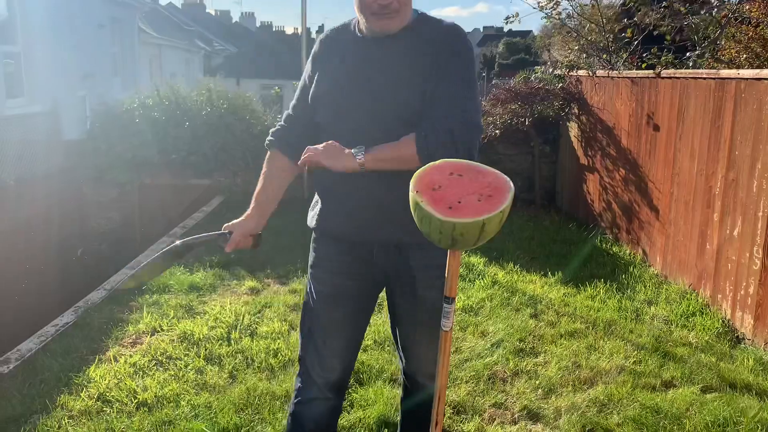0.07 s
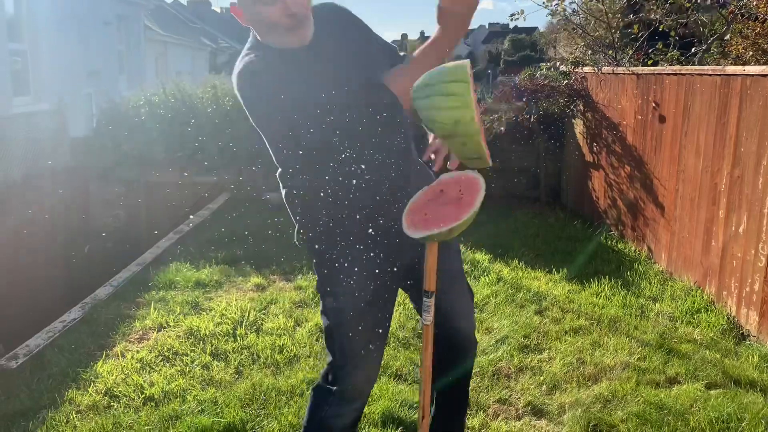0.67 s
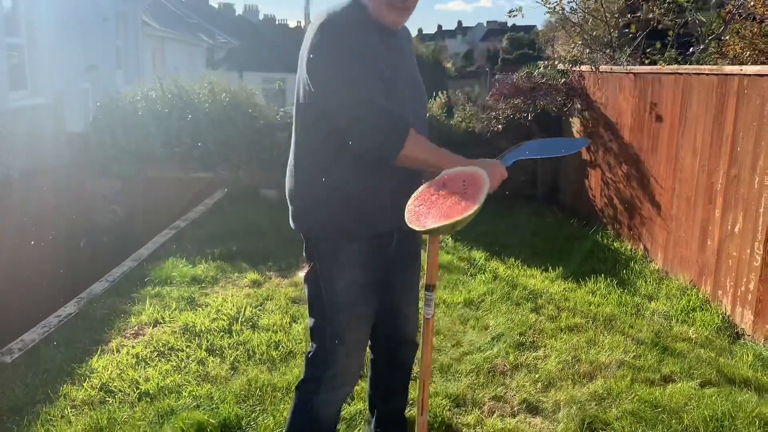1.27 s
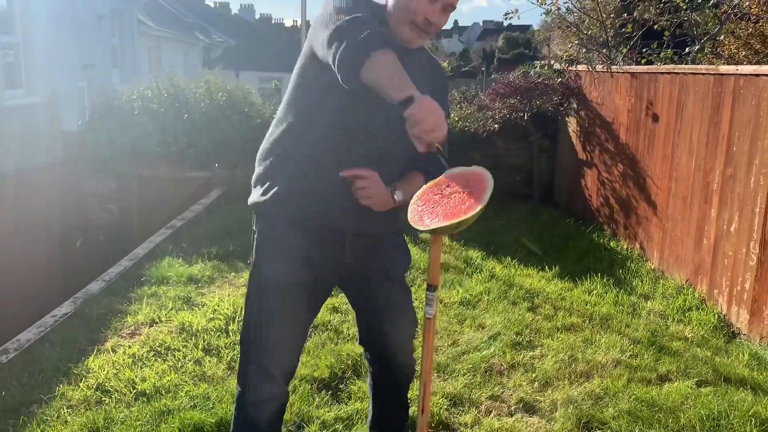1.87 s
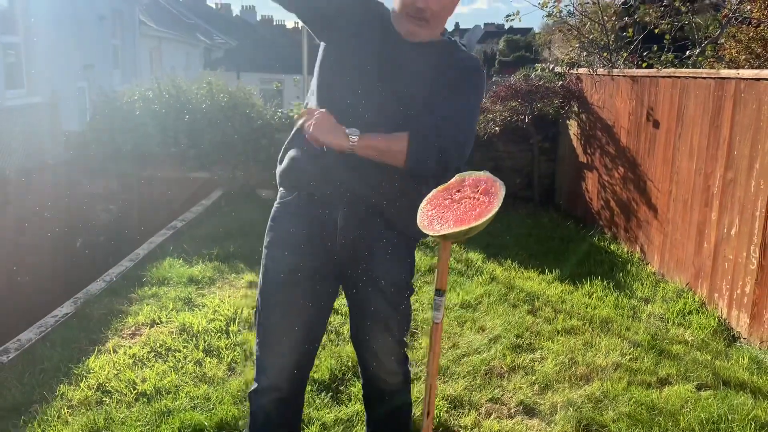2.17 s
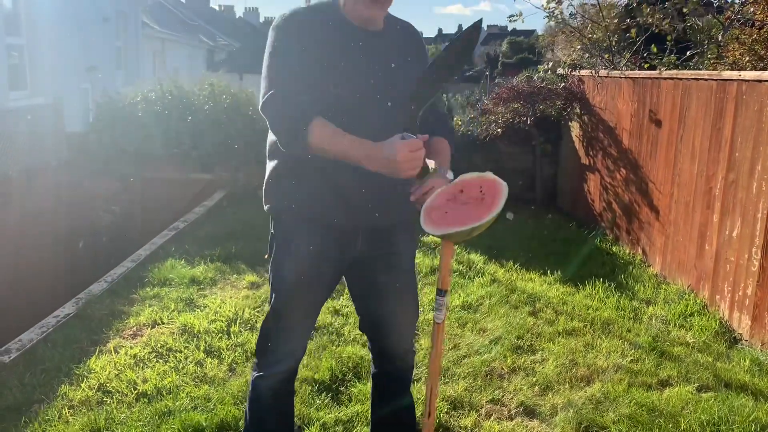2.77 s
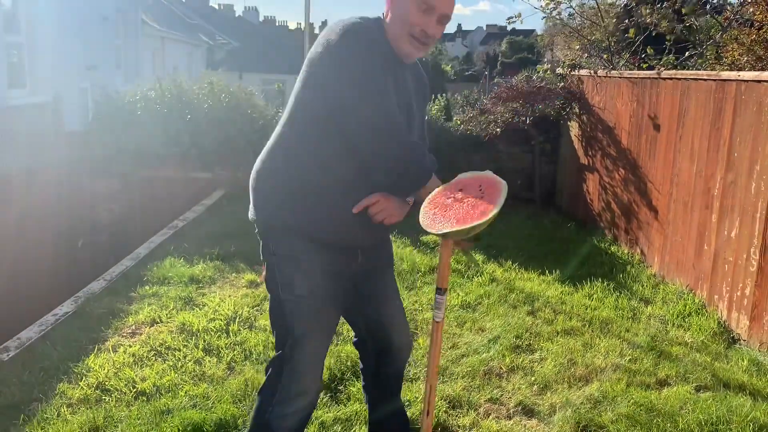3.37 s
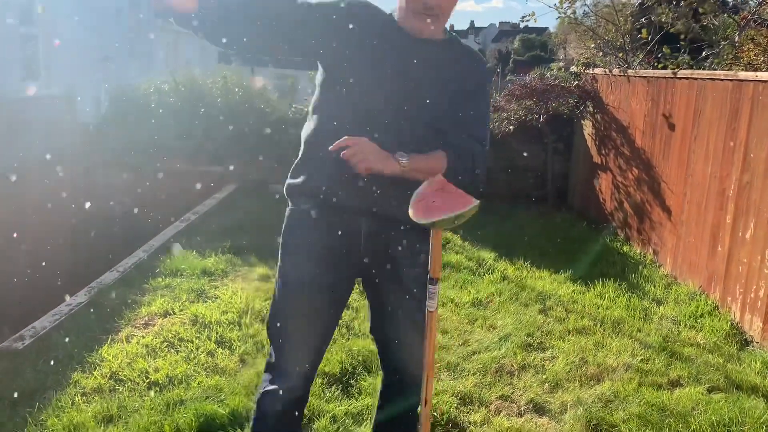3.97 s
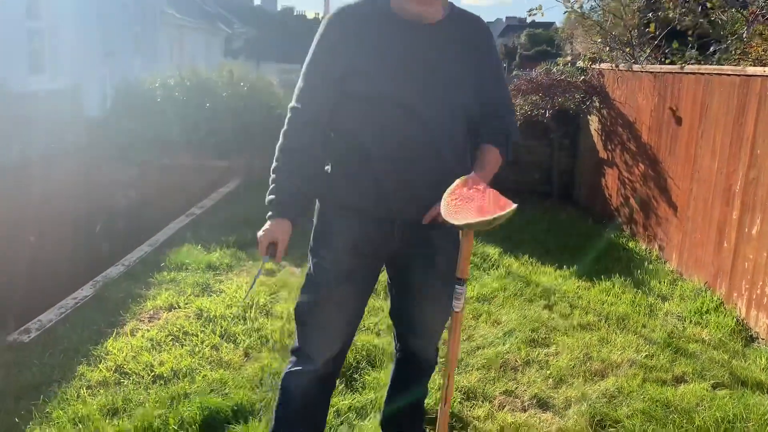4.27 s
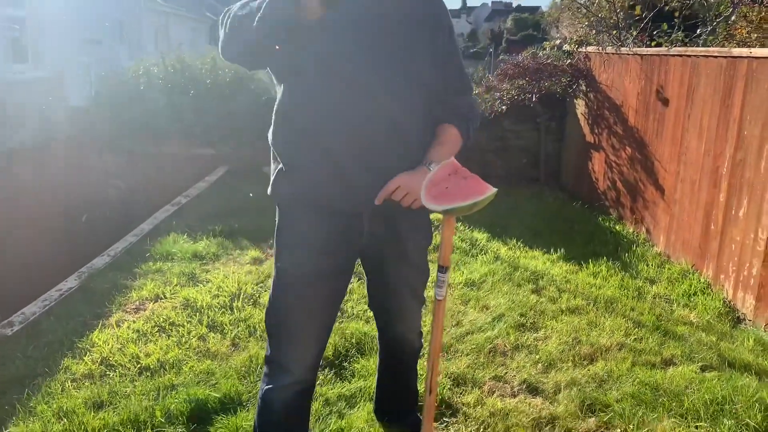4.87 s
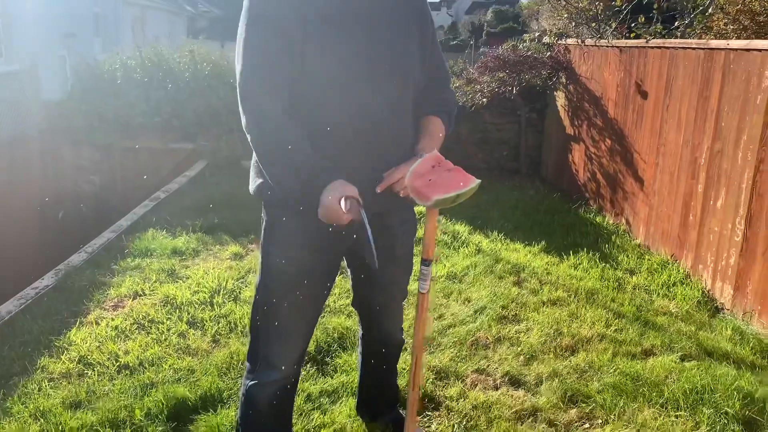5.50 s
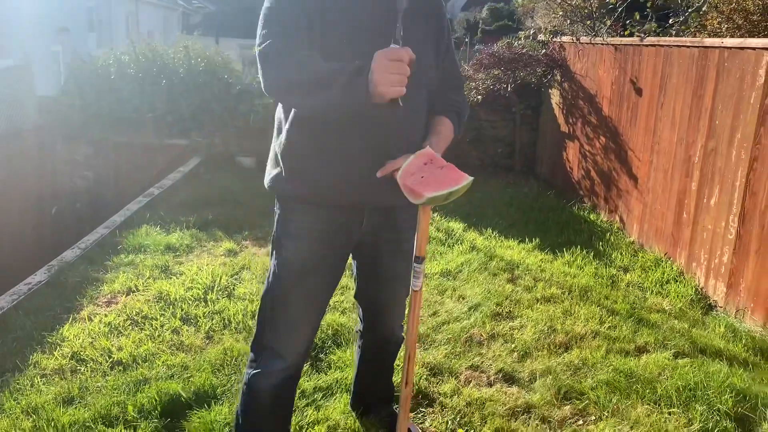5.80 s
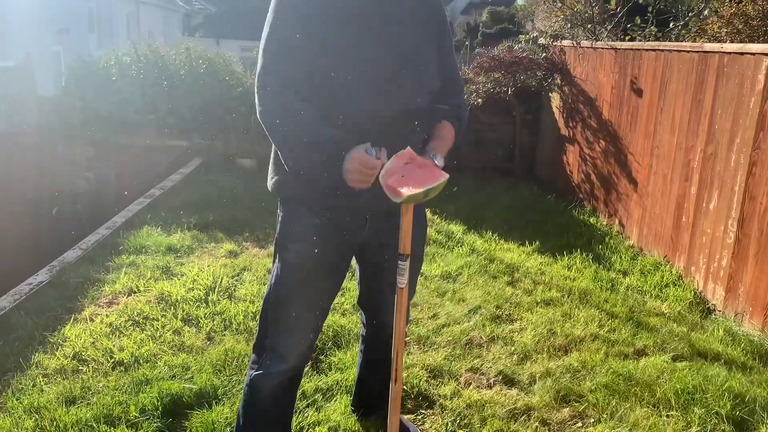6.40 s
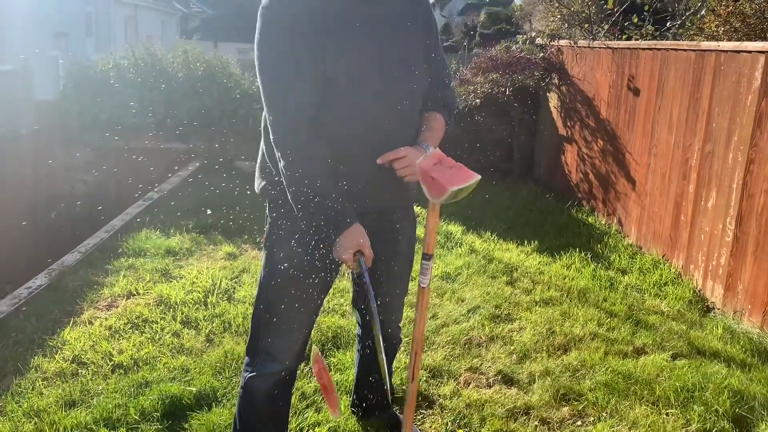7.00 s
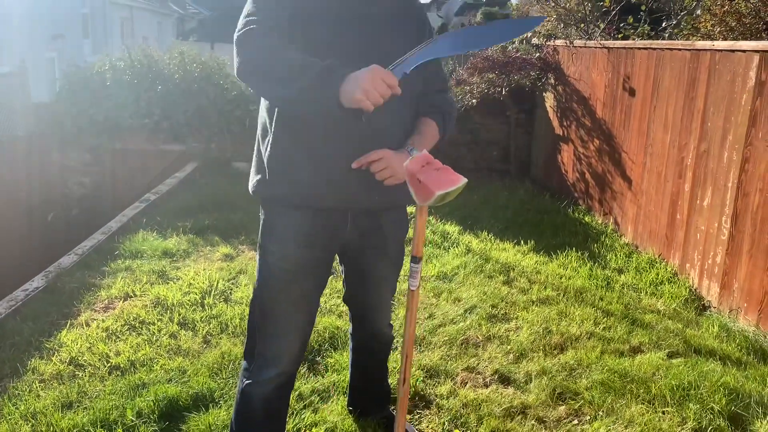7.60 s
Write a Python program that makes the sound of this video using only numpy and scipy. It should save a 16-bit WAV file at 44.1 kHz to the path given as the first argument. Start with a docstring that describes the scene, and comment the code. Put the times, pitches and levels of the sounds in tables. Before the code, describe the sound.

A long blade chops a watermelon with sharp, wet cracks, and pieces thump onto grass while wind buffets the microphone.

```python
"""A long steel blade slices a watermelon on a pole in a small fenced garden, six strokes in all.
Distant traffic, leaves and wind on the microphone run from the start. After an opening knock and splat,
the first stroke lands at 0.6 s: rind cracks, wet flesh tears, juice sprays. Pieces thump on the lawn
at 1.3 s. Strokes follow at 1.9, 3.5 and 5.1 s, with more falling pieces; the gusts peak near 5.4 s.
The last two come at 6.0 and 6.9 s. The blade rings faintly after strokes two, four and six."""
import sys
import numpy as np
from scipy import signal
from scipy.fft import rfft, irfft, next_fast_len
from scipy.io import wavfile
from scipy.ndimage import uniform_filter1d

SR = 44100
rng = np.random.default_rng(int(sys.argv[2]) if len(sys.argv) > 2 else 0)


def wav_record(signal):
    """Record a signal, one row per channel, as 16-bit PCM in the file named by sys.argv[1]."""
    frames = np.transpose(np.atleast_2d(signal))
    bounded = np.clip(frames, -1, 1)
    # unit amplitude maps onto the largest positive 16-bit level
    quanta = np.round(bounded * 32767).astype(np.int16)
    wavfile.write(sys.argv[1], SR, quanta)


N = 337365
CUTOFF_HZ = 15800


# blade through melon: rise/s, t/s, length/s, thud/dB, pulp/dB, pulp f/Hz, spray/dB
BLADE_CUTS = [(.002, 0.5985, 0.019, -27.5, -25.5, 2360, -27.5),
              (.001, 1.9112, 0.0032, -34, -28, 1800, -29.5),
              (.002, 3.5088, 0.0049, -33, -22.5, 1900, -27.5),
              (.002, 5.1380, 0.0034, -49, -28.5, 1500, -24), (0.0079, 6.0035, 0.013, -44.5, -32, 1620, -32),
              (0.0055, 6.8615, 0.016, -42, -28, 1570, -29.5)]
def strokes(slit_s=.01, slit_re_pulp_db=-16):
    """The edge hisses through the skin, then bites: at once if square, gradually if shaving a slice."""
    out, t = np.zeros((2, N)), seconds(size=2048)
    for rise_s, at_s, length_s, thud_db, pulp_db, pulp_hz, spray_db in BLADE_CUTS:
        slit = band(rng.standard_normal(len(t)) * (t / slit_s) * (t < slit_s), pulp_hz, pulp_hz * 2)
        add(out, at_s - slit_s, from_db(pulp_db + slit_re_pulp_db) * slit)
        bite = wet_blow(rise_s, length_s, thud_db, pulp_db, pulp_hz, spray_db,
                        body_hz=340, thud_decay_s=.0097)
        add(out, at_s, bite)
    return out


# hollow resonances of the fruit: f/Hz, width/Hz, gain/dB
MELON_MODES = [(1206, 280, -26.5), (1602, 110, -28), (2320, 130, -30)]
def wet_blow(rise_s, length_s, thud_db, pulp_db, pulp_hz, spray_db, body_hz, thud_decay_s):
    """The body thuds, pulp crushes in uneven spurts and juice sprays while contact lasts."""
    t = seconds(size=8192)
    tearing = rms_one(uniform_filter1d(rng.standard_normal(len(t)), size=70))
    spurts = rms_one(from_db(3 * tearing))
    push = widen(rng.standard_normal((2, len(t))), alike=.95) * swell(t, rise_s, length_s, thud_decay_s)
    crush = widen(grains(len(t), spread_db=8.5), alike=.68)
    crush *= spurts * swell(t, rise_s, length_s, decay_s=.0066)
    spray = grains(len(t), spread_db=5.5) * spurts * swell(t, rise_s, length_s, decay_s=.0053)
    thud = band(push, body_hz / 1.67, body_hz * 1.39)
    pulp = band(crush, pulp_hz / 2.42, pulp_hz * 1.437)
    hollow = sum(from_db(db) * band(pulp, hz - width / 2, hz + width / 2) for hz, width, db in MELON_MODES)
    flesh = from_db(-1) * pulp + hollow
    squelch = from_db(-7.5) * band(widen(spray, alike=.6), low_hz=2900, high_hz=4700)
    mist = band(spray[0], low_hz=5900, high_hz=14300)
    return from_db(thud_db) * thud + from_db(pulp_db) * flesh + from_db(spray_db) * (squelch + mist)


# rind snaps and knocks: t/s, peak/dB, f/Hz, rise/cycles
RIND_CRACKS = [(0.0642, -19, 520, 0.45), (0.5985, -9, 1570, 0.55), (1.2832, -15, 2500, 1.2),
               (1.3703, -23.5, 1450, 1.6), (1.9113, -19, 1860, 0.92), (3.5083, -9.5, 1210, 0.71),
               (4.0358, -18, 1520, 0.76), (4.0824, -16, 3500, 2.0), (6.0120, -22.5, 1120, 1.4),
               (6.8667, -18, 1770, 0.86)]
def cracks(tick_re_snap_db=-14, tick_decay_s=.0008, gap_s=.0035, loss_db=6, scatter=.25):
    """Skin parts with a tick, stiff rind with a damped snap; the split runs on in weaker snaps."""
    out, t = np.zeros((2, N)), seconds(size=2048)
    for at_s, peak_db, hz, rise_cycles in RIND_CRACKS:
        tick = widen(rng.standard_normal((2, len(t))), alike=.5) * np.exp(-t / tick_decay_s)
        add(out, at_s, from_db(peak_db + tick_re_snap_db) * band(tick, low_hz=2600, high_hz=7000))
        snap_hz = hz
        for k, (gap_ratio, pitch_ratio) in enumerate(np.exp(scatter * rng.standard_normal((5, 2)))):
            age = t * snap_hz / rise_cycles
            snap = age * np.exp(1 - age) * np.sin(2 * np.pi * snap_hz * t)
            add(out, at_s, from_db(peak_db - k * loss_db) * snap)
            at_s += gap_s * gap_ratio
            snap_hz = hz * pitch_ratio
    return out


# pieces on the lawn, plus a second bite of the last stroke at 6.9 s: t/s, length/s, thud/dB, pulp/dB, pulp
# f/Hz, spray/dB
FALLING_PIECES = [(0.061, .018, -33.5, -37, 2860, -33), (1.2623, 0.03, -30.5, -26.5, 2190, -31),
                  (1.2823, 0.0022, -23, -24, 3500, -30), (1.298, 0.04, -32, -39, 2900, -43.5),
                  (1.3465, 0.0022, -33, -28, 3300, -44), (1.370, 0.0045, -31.5, -34, 2220, -41.5),
                  (1.385, 0.064, -38, -50.5, 1580, -61), (4.0089, 0.016, -28.5, -24, 2940, -32.5),
                  (4.031, 0.022, -30, -29.5, 1640, -47), (4.081, 0.002, -26, -19, 3500, -33.5),
                  (4.100, 0.005, -31, -29.5, 2300, -38.5), (4.284, 0.021, -40, -39.5, 1890, -52.5),
                  (4.323, 0.033, -37.5, -47.5, 1970, -59), (5.3105, 0.0012, -36, -36.5, 2690, -45.5),
                  (5.3433, 0.0033, -32, -32, 1700, -60), (6.2532, 0.015, -33, -40, 2200, -41.5),
                  (6.277, 0.02, -31, -48.5, 1700, -50), (6.895, 0.018, -34.5, -39.5, 1750, -50),
                  (7.191, 0.0018, -53, -59, 2500, -39)]
def landings():
    """Soft ground gives a deeper, longer thud; longer contacts build more slowly."""
    out = np.zeros((2, N))
    for at_s, length_s, *blow in FALLING_PIECES:
        add(out, at_s, wet_blow(.09 * length_s, length_s, *blow, body_hz=284, thud_decay_s=.02))
    return out


# juice and crumbs: t/s, level/dB, treble re middle/dB
JUICE_DROPS = [(2.136, -54, 7), (4.285, -37, -5.5), (4.383, -43, -9.5), (4.511, -41, -13),
               (4.569, -36.5, 0), (4.6496, -51, 5.5), (6.5087, -42.5, -1)]
def drops(decay_s=.0061):
    """Juice and crumbs of flesh hit the grass as small wet ticks."""
    out, t = np.zeros((2, N)), seconds(size=4096)
    for at_s, level_db, treble_db in JUICE_DROPS:
        splash = grains(len(t), spread_db=-1.5) * np.exp(-t / decay_s)
        middle = band(splash, low_hz=1200, high_hz=4430)
        treble = from_db(treble_db) * band(splash, low_hz=4600, high_hz=CUTOFF_HZ)
        add(out, at_s, from_db(level_db) * (middle + treble))
    return out


# blade rings: t/s, level/dB, t60/s, time until damped/s, pitch ratio (flat when pulp clings)
BLADE_RINGS = [(1.914, -36, .25, .19, .981), (5.138, -52, .9, .145, 1), (6.885, -47.5, .45, .24, 1)]
# steel modes: f/Hz, level/dB, share of t60
BLADE_MODES = [(5568, 0, .45), (5610, 0, 1.0), (5790, -4, .3), (14230, -7, .4)]
def blade_ring(wavers_per_s=45, doppler=.0018, turn_db=1.2):
    """Free of the fruit, the steel rings until damped, wavering as it swings and turns."""
    out, t = np.zeros((2, N)), seconds(size=32768)
    quadrature = np.array([[0], [np.pi / 2]])
    for at_s, level_db, t60_s, free_s, pitch_ratio in BLADE_RINGS:
        swing, turn = drift(wavers_per_s)[:len(t)], drift(wavers_per_s)[:len(t)]
        warped_s = np.cumsum(1 + doppler * swing) / SR
        gate = swell(t, rise_s=.025, length_s=free_s, decay_s=.0153)
        for hz, mode_db, share in BLADE_MODES:
            phase = rng.uniform(0, 2 * np.pi) + quadrature
            fade = from_db(level_db + mode_db + turn_db * turn - 60 * t / (t60_s * share))
            add(out, at_s, fade * gate * np.sin(2 * np.pi * hz * pitch_ratio * warped_s + phase))
    return out


# phase between microphone ports: f/Hz, left lead/rad
PORT_LEAD = [(2000, 0), (3500, 2.1), (5500, 2.1), (8500, -3.5), (15500, -16)]
def ports(x):
    """The two ports hear the treble of near sounds out of step, half the shift on each side."""
    size = next_fast_len(N)
    lead_rad = np.interp(np.arange(size // 2 + 1) * SR / size, *np.transpose(PORT_LEAD))
    shift = np.exp(1j * lead_rad / 2 * np.array([[1], [-1]]))
    return irfft(rfft(x, size) * shift, size)[:, :N]


# echo tail: f/Hz, t60/s
TAIL_DECAY = [(1000, 0.13), (3500, 0.3), (15000, 0.12)]
def garden_echo(x, near_db=-12.5, near_decay_s=.015, far_db=-16, far_rise_s=.01, lowpass_hz=9600):
    """Ground and fence scatter the sound at once; houses and hedges return a short thin tail."""
    t, edges_hz = seconds(size=20000), np.geomspace(120, 18000, 8)
    tail = 0
    for low, high in zip(edges_hz, edges_hz[1:]):
        fade = from_db(-60 * t / at_hz(TAIL_DECAY, np.sqrt(low * high)))
        tail += band(rng.standard_normal((2, len(t))), low, high) * np.sqrt(high - low) * fade
    pole = np.exp(-2 * np.pi * lowpass_hz / SR)
    tail = signal.lfilter([1 - pole], [1, -pole], tail * np.minimum(t / far_rise_s, 1))
    near = grains(len(t), spread_db=14) * (t > .002) * np.exp(-t / near_decay_s)
    response = (from_db(near_db) * rms_one(near) + from_db(far_db) * rms_one(tail)) / np.sqrt(len(t))
    return signal.fftconvolve(x, response, axes=1)[:, :N]


# breeze on the microphone: t/s, level/dB
BREEZE_LEVELS = [(0, -40.5), (.42, -51.5), (1.18, -55), (1.32, -36.5), (2.06, -45), (2.41, -31),
                 (2.65, -47.5), (2.95, -38), (3.5, -40), (3.98, -47.5), (5.21, -35.5), (5.28, -27),
                 (5.5, -25), (5.64, -38.5), (6.17, -39), (6.29, -27.5), (7.11, -44), (7.65, -36.5)]
# single gusts: peak t/s, half length/s, level/dB
GUST_SWELLS = [(0.228, 0.035, -30.5), (0.529, 0.11, -37.5), (1.013, 0.015, -39.5), (1.72, 0.029, -29.5),
               (1.96, 0.014, -29), (2.503, 0.05, -27.5), (2.743, 0.037, -33), (2.89, .025, -31),
               (3.0, 0.051, -28.5), (3.158, .015, -34), (3.33, 0.025, -30.5), (3.756, 0.11, -22),
               (4.046, 0.017, -25.0), (4.341, 0.046, -29.5), (4.606, 0.027, -25.5), (4.938, 0.067, -21),
               (5.132, 0.012, -20), (5.425, 0.042, -17), (5.84, 0.079, -26), (6.222, 0.012, -19.5),
               (6.533, 0.062, -21.5), (6.722, 0.096, -25.5), (6.903, 0.025, -25.5), (7.356, 0.071, -24.5),
               (7.569, 0.018, -26.5)]
def wind_strength_db(waver_db=4, wavers_per_s=22):
    """Bell-shaped gusts add their power to a wavering breeze."""
    breeze_db, = in_time(BREEZE_LEVELS)
    breeze = from_db(breeze_db + waver_db * drift(wavers_per_s))
    gusts = [from_db(db) * bell(at_s, half_s) for at_s, half_s, db in GUST_SWELLS]
    return 10 * np.log10(breeze ** 2 + sum(gust ** 2 for gust in gusts))


# wind spectra: f/Hz, relative density/dB
RUMBLE_SPECTRUM = [(15, -36.5), (30, -5.5), (55, 8), (90, 7), (135, 0), (200, -11), (600, -65)]
FLUTTER_SPECTRUM = [(70, -12), (130, 1.5), (190, 2.5), (330, -12.5), (600, -22.5), (2000, -91.5)]
def wind(flutter_db=-23.5, flutter_growth=1.345, lumps_db=4.5):
    """Gusts press on both ports alike; strong, sustained ones shed small swirls that differ at each."""
    strength_db = wind_strength_db()
    rumble = noise(RUMBLE_SPECTRUM, channels=1)
    rumble /= np.sqrt(uniform_filter1d(rumble ** 2, size=1800) + .0067)   # each gust keeps its strength
    sustained_db = uniform_filter1d(strength_db, size=3500) - strength_db.max()
    flutter = widen(noise(FLUTTER_SPECTRUM, channels=2), alike=1 - 2 * from_db(sustained_db) ** 2)
    flutter *= from_db(lumps_db * drift(per_s=60))
    return from_db(strength_db) * rumble + from_db(flutter_db + flutter_growth * sustained_db) * flutter


# eddies at the microphone: t/s, peak/dB, initial top f/Hz
EDDY_PUFFS = [(0.223, -21, 333), (0.513, -27, 350), (2.476, -20, 420), (3.739, -14, 760), (4.809, -24, 520),
              (4.894, -12, 720), (4.927, -19, 640), (5.225, -25, 700), (5.366, -18, 680),
              (5.394, -18.5, 700), (5.418, -13, 780), (5.484, -22.5, 563), (6.345, -21, 380),
              (6.455, -19, 390), (6.563, -17.5, 440), (6.700, -22.5, 440)]
def eddies(rise_s=.0036, band_ratio=4.2, slowing_s=.03):
    """An eddy breaks on the ports as a muffled puff that sinks in pitch as it slows."""
    out, t = np.zeros((2, N)), seconds(size=4096)
    slowed_s = slowing_s * np.log1p(t / slowing_s)
    for at_s, peak_db, top_hz in EDDY_PUFFS:
        push = rng.standard_normal((2, len(t))) * t / rise_s * np.exp(-t / rise_s)
        low_hz = top_hz / band_ratio
        swirl = band(band(push, low_hz, top_hz), low_hz, top_hz)
        puff = widen([rms_one(np.interp(slowed_s, t, row)) for row in swirl], alike=.37)
        add(out, at_s, from_db(peak_db) * puff / np.abs(puff).max())
    return out


# garden background: t/s, traffic/dB, branches/dB
GARDEN_LEVELS = [(0.0, -59, -66.5), (0.9, -54.5, -67), (2.77, -57.5, -62), (4.15, -54, -63),
                 (6.85, -55, -64.5), (7.65, -52, -60.5)]
# background spectra: f/Hz, relative density/dB
TRAFFIC_SPECTRUM = [(30, -5), (100, -0.5), (250, 10.5), (550, 3), (900, 5.5), (1400, -4), (5000, -44.5)]
BRANCH_SPECTRUM = [(700, -0.5), (1500, 6), (3800, -2), (9000, -29.5)]
def traffic_and_branches():
    """Far traffic hums; the breeze rushes through nearby branches."""
    traffic_db, branches_db = in_time(GARDEN_LEVELS)
    traffic = from_db(traffic_db) * widen(noise(TRAFFIC_SPECTRUM, channels=2), alike=.24)
    branches = from_db(branches_db) * noise(BRANCH_SPECTRUM, channels=2)
    return traffic + branches


# clothes, grass and falling juice: centre t/s, half length/s, hiss/dB, rub/dB
SOFT_SWISHES = [(.3, .2, -67, -76), (1.528, 0.1, -64, -61.5), (1.975, 0.055, -56, -65),
                (2.388, 0.087, -60, -72), (2.8, 0.096, -81.5, -62), (3.193, 0.097, -65, -65),
                (4.37, 0.31, -70, -66.5), (7.183, 0.012, -48.5, -66)]
# leaf and swish hiss: f/Hz, relative density/dB
HISS_SPECTRUM = [(2500, 6.5), (7000, 5.5), (13500, 5.5), (16000, -12.5)]
def rustle(leaves_db=-77, flicker_db=2.8):
    """Leaves hiss faintly; movement adds swells of hiss and rubbing cloth."""
    hiss_gain, rub_gain = from_db(leaves_db), 0
    for at_s, half_s, hiss_db, rub_db in SOFT_SWISHES:
        shape = bell(at_s, half_s)
        hiss_gain += from_db(hiss_db) * shape
        rub_gain += from_db(rub_db) * shape
    cloth = band(grains(N, spread_db=6.5), low_hz=1500, high_hz=3595)
    hiss = from_db(flicker_db * drift(per_s=130)) * noise(HISS_SPECTRUM, channels=2)
    return rub_gain * cloth + hiss_gain * hiss


def narrow_bass(x, mono_below_hz=190):
    """Long waves reach both ports alike."""
    mid, side = (x[0] + x[1]) / 2, (x[0] - x[1]) / 2
    side = signal.sosfilt(signal.butter(4, mono_below_hz, "high", fs=SR, output="sos"), side)
    return np.array([mid + side, mid - side])


def from_db(db):
    return 10 ** (np.asarray(db) / 20)


def rms_one(x):
    return x / np.sqrt(np.mean(x ** 2) + 1e-20)


def seconds(size):
    return np.arange(size) / SR


def in_time(rows):
    """One linear curve per level column."""
    times_s, *columns = np.transpose(rows)
    return [np.interp(seconds(N), times_s, column) for column in columns]


def at_hz(points, hz):
    """Table lookup on a log-frequency axis."""
    points_hz, values = np.transpose(points)
    return np.interp(np.log(np.maximum(hz, 1)), np.log(points_hz), values)


def band(x, low_hz, high_hz):
    """Causal band-pass; keeps white noise at its level."""
    high_hz = min(high_hz, .45 * SR)
    low_hz = min(low_hz, .9 * high_hz)
    sos = signal.butter(2, [low_hz, high_hz], "band", fs=SR, output="sos")
    return signal.sosfilt(sos, x + 1e-18) * np.sqrt(SR / 2 / (high_hz - low_hz))


def noise(spectrum, channels):
    """Independent rows of coloured noise, rms 1, rolled off above the last point."""
    size = next_fast_len(N)
    hz, top_hz = np.arange(size // 2 + 1) * SR / size, spectrum[-1][0]
    gain = from_db(at_hz(spectrum, hz)) * (top_hz / np.maximum(hz, top_hz)) ** 2
    white = rng.standard_normal((channels, size))
    return rms_one(irfft(rfft(white) * gain, size)[:, :N])


def grains(size, spread_db):
    """Two rows of tiny bursts of uneven size, rms 1."""
    white = rng.standard_normal((2, size))
    sizes_db = spread_db * np.clip(rng.standard_normal((2, size)), -2, 2)
    return rms_one(white * from_db(sizes_db))


def drift(per_s):
    """Random wander, rms 1."""
    knots = rng.standard_normal(4096)
    return rms_one(np.interp(seconds(N) * per_s, np.arange(len(knots)), knots))


def swell(t, rise_s, length_s, decay_s):
    """Linear rise, hold until length_s, exponential decay."""
    return np.minimum(t / max(rise_s, 1e-4), 1) * np.exp(-np.maximum(t - length_s, 0) / decay_s)


def bell(at_s, half_s):
    return np.exp(-((seconds(N) - at_s) / half_s) ** 2)


def widen(pair, alike):
    """Two independent rows to left and right with correlation `alike`."""
    alike = np.clip(alike, 0, 1)
    return np.sqrt((1 + alike) / 2) * pair[0] + np.sqrt((1 - alike) / 2) * pair[1] * np.array([[1], [-1]])


def add(out, at_s, sound):
    start = int(np.clip(round(at_s * SR), 0, N - 1))
    out[:, start:start + sound.shape[-1]] += sound[..., :N - start]


def scene():
    """Melon, echo and blade over wind and garden."""
    fruit = ports(strokes() + landings() + cracks() + drops())
    echo = garden_echo(fruit)
    buffeting = wind() + eddies()
    garden = traffic_and_branches() + rustle()
    return narrow_bass(fruit + echo + blade_ring() + buffeting + garden)


def record(dry):
    """Steep low-pass."""
    return signal.sosfilt(signal.ellip(10, .1, 80, CUTOFF_HZ, fs=SR, output="sos"), dry)


dry = scene()
out = record(dry)
wav_record(out)
```